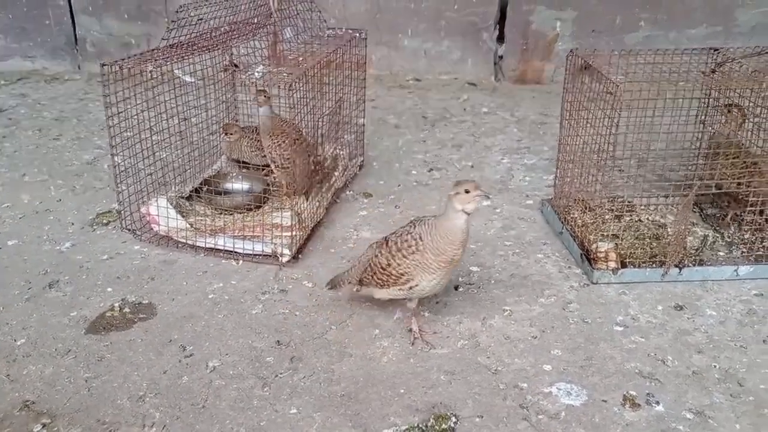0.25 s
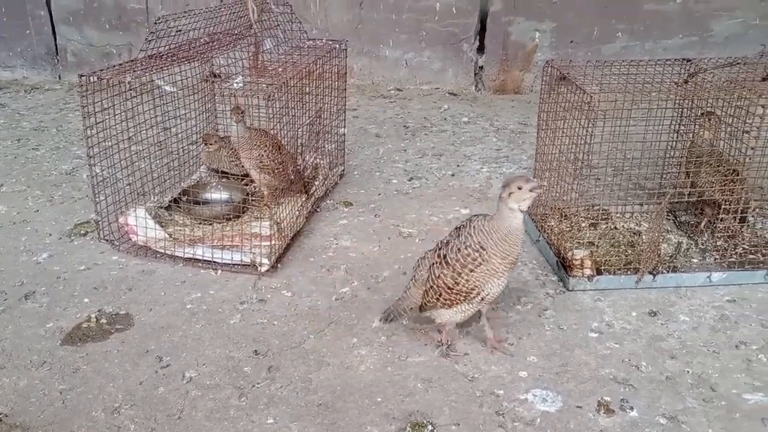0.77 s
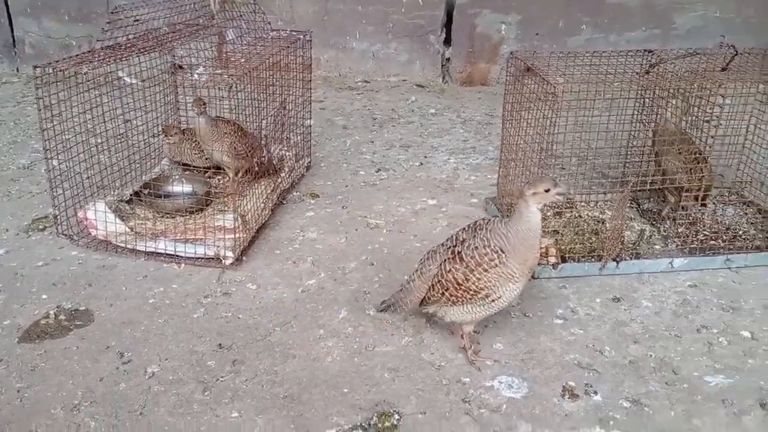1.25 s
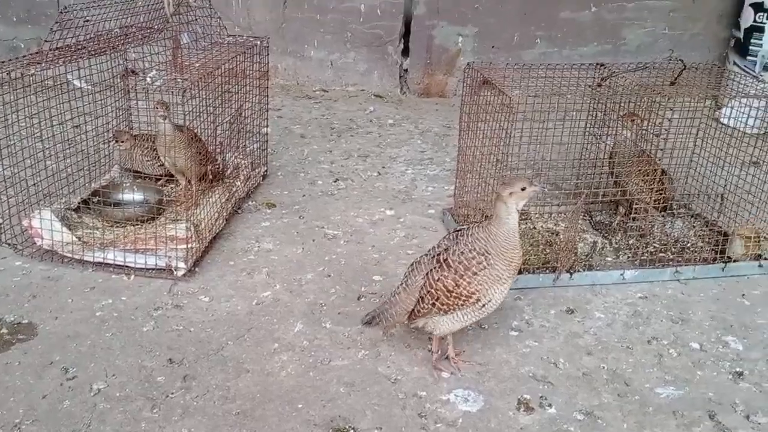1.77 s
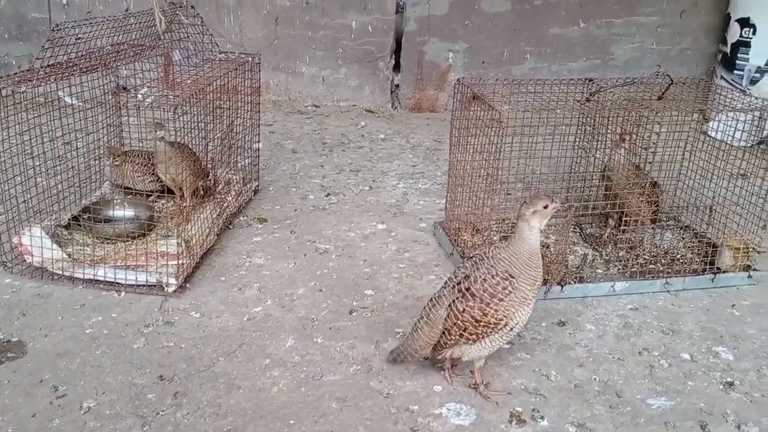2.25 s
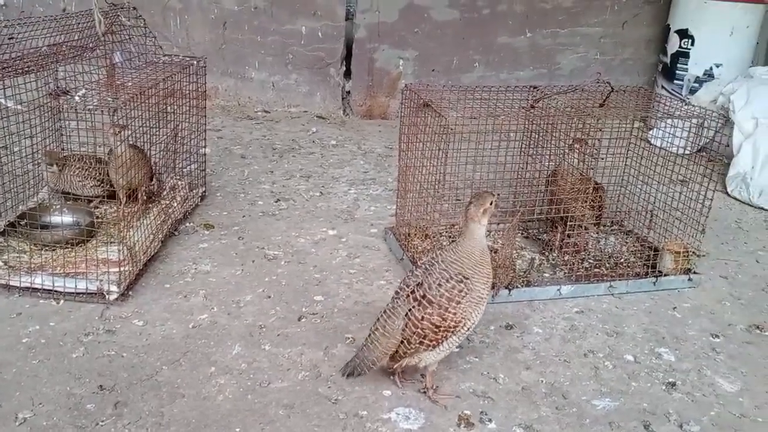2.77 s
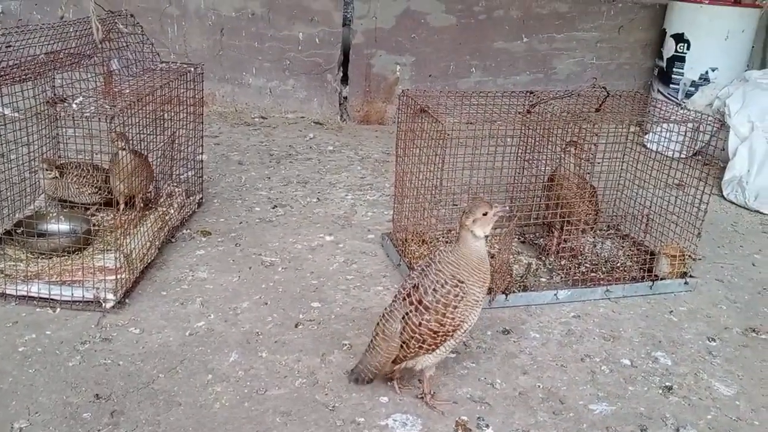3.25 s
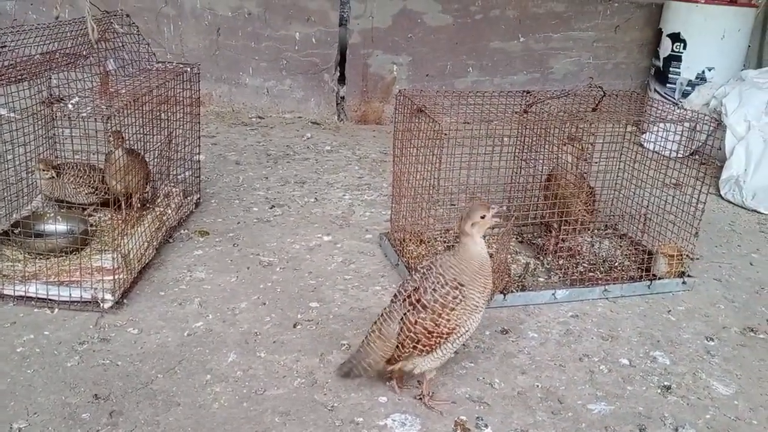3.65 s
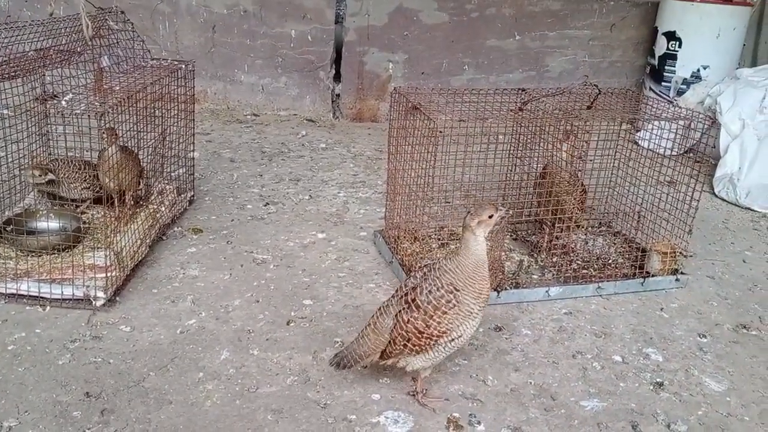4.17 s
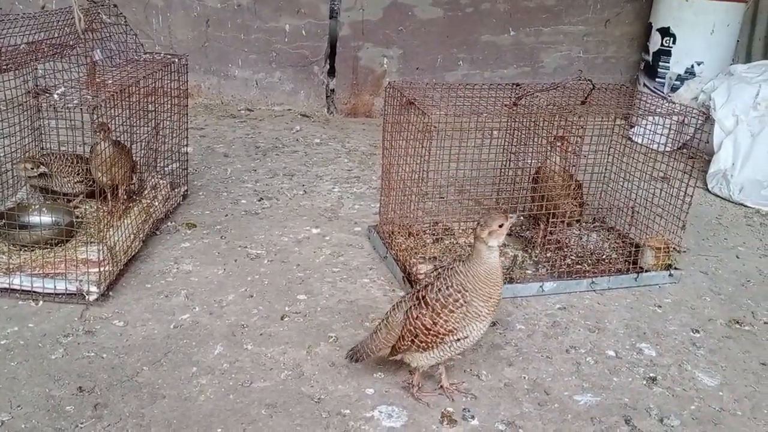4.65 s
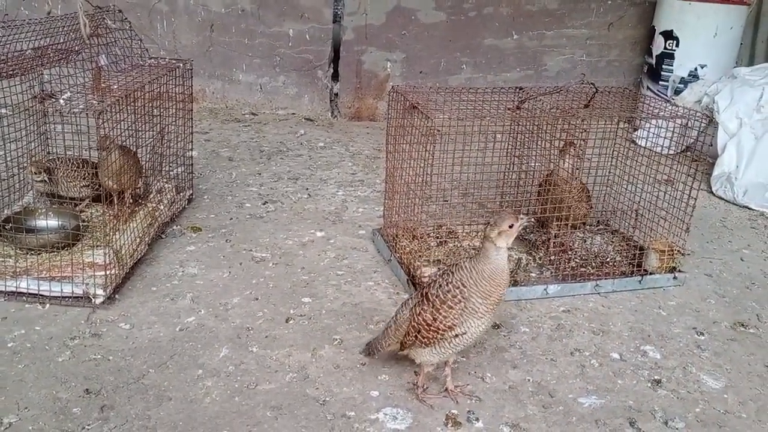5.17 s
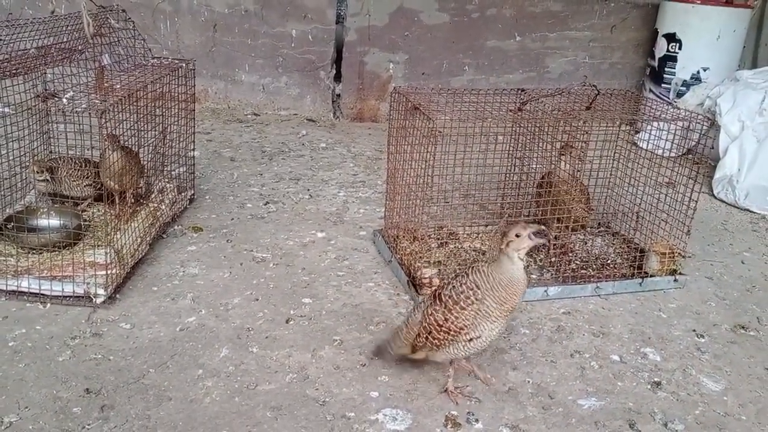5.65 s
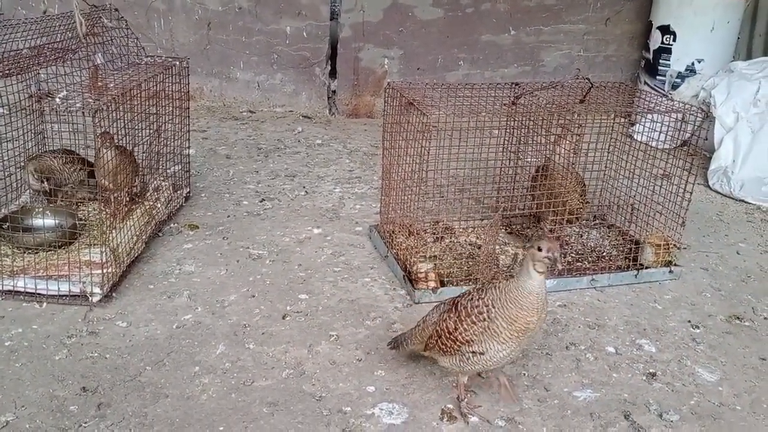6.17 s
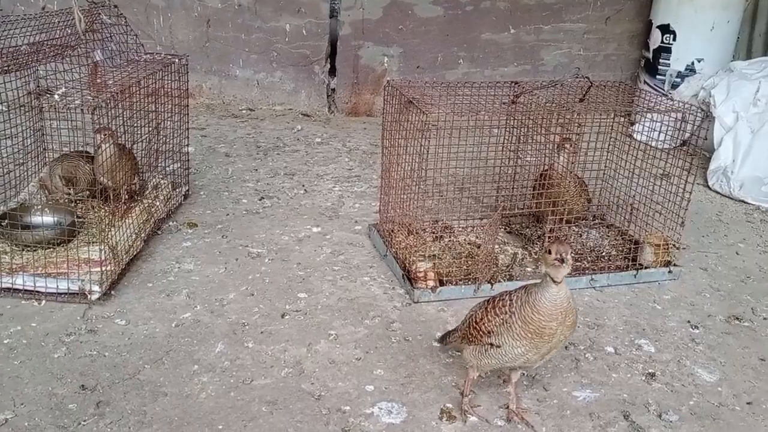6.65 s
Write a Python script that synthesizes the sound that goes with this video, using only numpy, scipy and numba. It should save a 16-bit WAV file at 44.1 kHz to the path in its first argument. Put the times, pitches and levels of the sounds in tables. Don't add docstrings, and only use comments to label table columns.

```python
import sys
import numpy as np
from scipy import signal
from scipy.fft import rfft, irfft, next_fast_len
from scipy.io import wavfile
from scipy.ndimage import uniform_filter1d
from numba import njit

SR = 44100
rng = np.random.default_rng(int(sys.argv[2]) if len(sys.argv) > 2 else 0)


def output_pcm(signal):
    pcm = np.clip(np.atleast_2d(signal).T, -1, 1) * 32767
    wavfile.write(sys.argv[1], SR, np.round(pcm).astype(np.int16))


def makeup_ratio(level_db):
    decades = np.asarray(level_db, float) / 20
    return 10 ** decades


N = 304290

# start_s, kee_lag_s, level_db, whistle_length_factor (0 = none), kee_slides (0 = snaps)
CALLS = [(0.192, .01, -5.5, 0.004, 1), (.793, .012, -2.5, 0.01, 1), (1.303, 0.098, -2, .9, 0),
         (2.027, 0.019, -1.5, 0, 0), (2.374, 0.15, 0, 1.05, 0), (3.075, 0.15, 0.5, 1.2, 0),
         (3.637, 0.16, 1.5, 1, 0), (4.189, .16, 0.5, 1.3, 1), (4.901, 0.16, 0.23, 1.01, 1),
         (5.609, .161, -0.5, 1.01, 1), (6.181, 0.17, 2.15, 1.01, 1)]
# start_s, level_db, length_factor, split_pitch_factor
TARS = [(0.428, -8, 0.77, 0.74), (1.035, -5, 0.65, 1.005), (1.636, -4.5, 0.88, 1.01),
        (2.263, -5, 0.76, 1.03), (2.768, -3.5, 0.93, 1.03), (2.928, -8.5, 1.01, 0.96),
        (3.474, -3, 0.82, 1.004), (4.053, -3, 0.74, 1.017), (4.596, -4.5, 0.93, 1.01),
        (4.769, -8.5, 0.79, 0.89), (5.297, -3.5, 0.87, 1.01), (5.454, -9, 0.96, 0.88),
        (6.015, -4, 0.85, 0.95), (6.606, -3.5, 0.91, 1), (6.755, -7, 0.7, 0.78)]
# stages = length_s, level_db, half_partials_db, roughness_0_to_1; hz = from_hz, to_hz per stage
TIK = dict(stages=[(.009, -2, -27, 0.1), (.022, -0.5, 5, 0.72)], hz=[(2278, 2450), (1802, 1500)],
       blend_s=0.0027, sag_db=8.5, release_s=0.011)
BARE_TIK = dict(stages=[(.05, -4, -2, .9)], hz=[(1880, 1800)], blend_s=.004, sag_db=4, release_s=.016)
WHEET = dict(stages=[(.074, -3, -50, 0.028)], hz=[(3600, 3530)],
         blend_s=0.0098, sag_db=-0.5, release_s=.011)
CLUCK = dict(stages=[(.005, 5, -25, 0.26), (.018, 12.3, -14.5, 0.44)], hz=[(3465, 2500), (2893, 2500)],
         blend_s=0.0032, sag_db=10, release_s=0.01)
SPLIT_NOTE = dict(stages=[(.03, -10.5, -31, .15)], hz=[(3090, 3020)],
              blend_s=.005, sag_db=3, release_s=.012)
TAR = dict(stages=[(.045, -13.5, -17.5, 0.14), (.042, -16.5, 13.5, .36)], hz=[(700, 1400), (1200, 1020)],
       blend_s=0.012, sag_db=7.5, release_s=.015)
# length_s, level_db, half_partials_db, roughness_0_to_1
RISE_STAGES = [
    (.04, -10, -21.5, 0.52),
    (.066, 7, -36.5, 0.064),
    (.04, 0, -48.5, 0.23),
    (0.015, -1.5, -43.5, .12),
]
# freq_hz, gain_db
BEAK_WIDE = [(300, -67), (800, -47), (1300, -44.5), (2500, -22), (3000, 0), (3550, 4), (4600, -7),
             (5600, -9), (7100, -11.5), (10700, -12.5), (14300, 1)]
BEAK_HALF = [(300, -91.5), (800, -55), (1250, -21), (2000, -2.5), (2600, 1), (3050, 1.5), (3800, 0.5),
             (4500, -14.5), (5100, 1), (6200, -2), (7300, -15.5)]
BEAK_SHUT = [(250, -57), (550, -38), (800, -12), (1200, -3.5), (1700, 2), (2200, -14.5), (2800, -14),
             (3500, -14), (4500, -34.5), (6600, -28.5), (7400, -41), (14000, -35.5)]
HEN_BEAK = [(300, -89.5), (1000, -23), (2000, -20.5), (2800, -1), (4000, -9), (5000, -17), (6500, -29.5),
            (7400, -41)]
# start_s, level_db, length_factor, steady_hz, weakening_hz
RISES = [
    (-.096, 1.3, 1.23, 3627, 3736),
    (0.579, 2.8, 1, 3430, 3804),
    (1.161, 2.7, 1.03, 3284, 3643),
    (1.772, 1.4, 0.95, 3430, 3685),
    (2.405, 1.8, 1.02, 3564, 3890),
]
# start_s, peak_db, ring_hz, crack_db
THUMPS = [
    (0.158, -41, 377, 16),
    (1.35, -19, 87.6, -0.5),
    (2.445, -16.5, 193, -47),
    (2.456, -11, 134.7, -8),
    (2.632, -26.5, 173, -1.5),
    (2.957, -35.5, 554, -16),
    (3.034, -35.5, 377, -10.5),
    (5.966, -41.5, 394, -11),
]
# freq_hz, t60_s
WALL_RING = [(500, 0.22), (1100, 0.37), (1700, 0.42), (2600, 0.37), (3600, 0.24), (5500, 0.27),
             (8000, 0.33)]
# freq_hz, density_db_per_hz
HUSH = [(18, -87), (30, -66), (270, -36.5), (747, -69.5), (1470, -11), (2300, -24.5), (3980, 8.5),
        (5040, -27), (6210, -51), (9430, -87), (15500, -33.5)]
# freq_hz, density_db_per_hz
TRAFFIC = [(30, -29), (100, 4), (200, -3), (350, -3), (600, -34)]


def cock():
    wheet_lag_share, easy_lag_s, rush_flat = .29, .162, 0.063
    cluck_lag_s, split_lag_s = .061, .11
    tiks, bare_tiks, wheets, clucks, kees, splits = [], [], [], [], [], []
    for s, lag_s, db, length, slides in CALLS:
        if length > .5:
            wheet_s = s + wheet_lag_share * lag_s
            tiks.append((s, db + 0.5, 1, 1))
            wheets.append((wheet_s, -4, length, 1 - rush_flat * (1 - lag_s / easy_lag_s)))
            clucks.append((wheet_s + min(cluck_lag_s, lag_s / 2), -9, 1, 1))
        else:
            bare_tiks.append((s, db, 1, 1))
        kees.append((kee(slides > .5), BEAK_HALF, [(s + lag_s, db, 1, 1)]))
        if slides < .5:
            splits.append((s + lag_s + split_lag_s, db, 1, 1))
    middle = [(shaped(**BARE_TIK), BEAK_WIDE, bare_tiks),
              (shaped(**TIK), BEAK_WIDE, tiks),
              (shaped(**CLUCK), BEAK_WIDE, clucks)]
    middle += kees + [(shaped(**SPLIT_NOTE), BEAK_HALF, splits)]
    tars = [(tar(pitch), BEAK_SHUT, [(s, db, length, 1)]) for s, db, length, pitch in TARS]
    whistle = bird([(shaped(**WHEET), BEAK_WIDE, wheets)], wet_db=1.9, breath_db=-8.5, overtone_db=-4.5)
    low = bird(tars, wet_db=-3.0, breath_db=20, overtone_db=0.0)
    return whistle + low + bird(middle, wet_db=-0.86, breath_db=-6, overtone_db=-16.5)


def kee(slides):
    lead = (.031, -14, 11, .7)
    hold_s, *hold = .063, -2.5, -25, .15
    hz = [(2250, 2550), (2560, 2515)]
    if slides:
        ends = [(hold_s, *hold), (.06, -3, -42, .08)]
        ends_hz = [(2515, 1842)]
    else:
        snap_wait_s = .028
        ends = [(hold_s + snap_wait_s, *hold), (.016, -7, -30, .15), (.026, -11, -4, .25)]
        ends_hz = [(2515, 2005), (2005, 1990)]
    return shaped([lead] + ends, hz + ends_hz, blend_s=0.028, sag_db=7.0, release_s=0.018, attack_s=.009)


def tar(pitch):
    scoop_hz, split_hz = TAR["hz"]
    return shaped(**dict(TAR, hz=[scoop_hz, np.multiply(split_hz, pitch)]))


def hen():
    notes = [(rise(*hz), HEN_BEAK, [(s, db, length, 1)]) for s, db, length, *hz in RISES]
    return bird(notes, wet_db=-7.5, breath_db=-13.5, overtone_db=-28.5)


def rise(steady_hz, knee_hz):
    start_hz, end_hz, hook_share = 2950, 4220, .5
    hook_hz = end_hz - hook_share * (end_hz - knee_hz)
    hz = [start_hz, steady_hz, knee_hz, hook_hz, end_hz]
    return shaped(RISE_STAGES, list(zip(hz, hz[1:])), blend_s=0.02, sag_db=1.5, release_s=0.022)


def shaped(stages, hz, blend_s, sag_db, release_s, attack_s=1):
    start, rate, effort = 0, [], [(0, stages[0][1] - 18, *stages[0][2:])]
    for (s, *held), (from_hz, to_hz) in zip(stages, hz):
        rate += [(start + 0.00218, from_hz), (start + s, to_hz)]
        blend_end = start + min(blend_s, .7 * s, 1 if start else attack_s)
        effort += [(blend_end, *held), (start + s, *held)]
        start += s
    db, *voice = stages[-1][1:]
    effort[-1:] = [(start, db - sag_db, *voice), (start + release_s, db - sag_db - 31, *voice)]
    return rate, effort


def syllable(rate, effort, beak, length, hoarse, pitch, breath_db, overtone_db):
    size = next_fast_len(int(effort[-1][0] * length * SR) + 99)
    t = np.arange(size) / SR / length
    s, *cols = np.transpose(effort)
    db, half_db, rough = [np.interp(t, s, c) for c in cols]
    rough = np.clip(rough + hoarse, 0, 1)
    pitch_shake, level_shake = unit(band(rng.standard_normal((2, size)), 263, "low", order=4))
    hz = pitch * np.interp(t, *np.transpose(rate)) * (1 + 0.0765 * rough * pitch_shake)
    k = np.arange(1, 17)[:, None] / 2
    source_db = (k % 1 > 0) * half_db + overtone_db * np.log2(np.maximum(k, 1))
    gain_db = source_db + along(beak, k * hz) - 90 * (k * hz > SR / 3)
    phase = 2 * np.pi * k * np.cumsum(hz) / SR + k * k
    tone = np.sum(makeup_ratio(gain_db) * np.sin(phase), axis=0)
    flutter = 1 - .5 * rough + 0.42 * rough * level_shake
    breath = makeup_ratio(breath_db) * (rough + 0.0033) * band(coloured(size, beak), 2260, "high", order=4)
    return (t < s[-1]) * makeup_ratio(db) * (tone * flutter + breath)


def bird(parts, wet_db, breath_db, overtone_db):
    track = np.zeros(N + SR)
    for (rate, effort), beak, notes in parts:
        for s, db, length, pitch in notes:
            note = syllable(rate, effort, beak, length, 0.048, pitch, breath_db, overtone_db)
            add(track, s, makeup_ratio(db) * yard(note, wet_db))
    return track[SR:]


def thumps():
    ring_t60_s, crack_t60_s = .088, 0.17
    track, t = np.zeros(N + SR), np.arange(SR // 5) / SR
    for s, db, hz, crack_db in THUMPS:
        ring = np.sin(2 * np.pi * hz * t) * makeup_ratio(-60 * t / ring_t60_s) * (1 - np.exp(-t / 0.00027))
        crack = makeup_ratio(crack_db - 60 * t / crack_t60_s) * band(rng.standard_normal(len(t)), 3800, "low")
        add(track, s, makeup_ratio(db + 4.5) * yard(ring + crack, wet_db=-6.5))
    return track[SR:]


def yard(x, wet_db):
    hz, t, z = signal.stft(rng.standard_normal(SR // 2), SR, nperseg=256)
    tail = signal.istft(z * makeup_ratio(-60 * t / along(WALL_RING, hz)[:, None]), SR, nperseg=256)[1]
    build_up_s = .01
    tail = tail * (1 - np.exp(-np.arange(len(tail)) / SR / build_up_s))
    tail = makeup_ratio(wet_db) * tail / np.linalg.norm(tail)
    tail[0] = 1
    return signal.fftconvolve(x, tail)


def background():
    swell = unit(band(rng.standard_normal(N), 12.3, "low"))
    return makeup_ratio(-61) * coloured(N, HUSH) + makeup_ratio(-70 + 11.0 * swell) * coloured(N, TRAFFIC)


def add(track, s, x):
    spot = track[round((s + 1) * SR):][:len(x)]
    spot += x[:len(spot)]


def unit(x):
    return x / np.sqrt(np.mean(x ** 2) + 1e-20)


def along(points, hz):
    f, v = np.transpose(points)
    return np.interp(np.log(np.maximum(hz, 1)), np.log(f), v)


def band(x, hz, kind, order=2):
    return signal.sosfilt(signal.butter(order, hz, kind, fs=SR, output="sos"), x)


def coloured(size, points):
    spectrum = rfft(rng.standard_normal(size))
    return unit(irfft(spectrum * makeup_ratio(along(points, np.fft.rfftfreq(size, 1 / SR))), size))


def scene():
    voices = cock() + hen() + thumps()
    trace = makeup_ratio(-30.5) * band(voices, 7600, "high", order=8)
    return (band(voices, 7250, "low", order=14) + trace + background())[None]


@njit
def follow(level, rise, fall):
    out, state = np.empty_like(level), level[0]
    for i in range(len(level)):
        state += (rise if level[i] > state else fall) * (level[i] - state)
        out[i] = state
    return out


def top_cut(x):
    return signal.sosfilt(signal.butter(12, 16010, fs=SR, output="sos"), x)


def record(dry):
    attack_s, release_s = 0.0049, .06
    power = np.abs(uniform_filter1d(dry[0] ** 2, size=88))
    power = follow(power, 1 / (attack_s * SR), 1 / (release_s * SR))
    x = dry * makeup_ratio(-6.5) * (power + makeup_ratio(-76)) ** -.17
    top = np.where(x > 0, .64, .7)
    x = x / (1 + np.abs(x / top) ** 9) ** (1 / 9)
    hiss = coloured(N, [(7000, -49), (9500, -7.0), (12000, -8.0), (14000, 2), (15500, -9.5)])
    x = x + hiss * (makeup_ratio(-90.0) + makeup_ratio(-62.5) * np.abs(uniform_filter1d(x ** 2, size=1500)))
    return top_cut(band(x, 46, "high"))


dry = scene()
out = record(dry)
output_pcm(out)
```